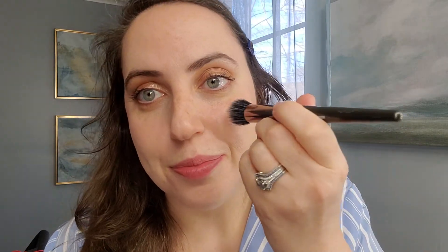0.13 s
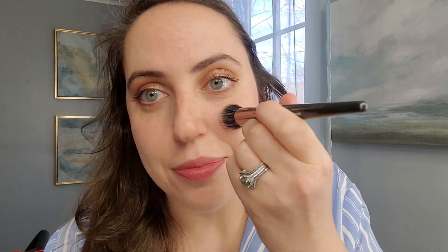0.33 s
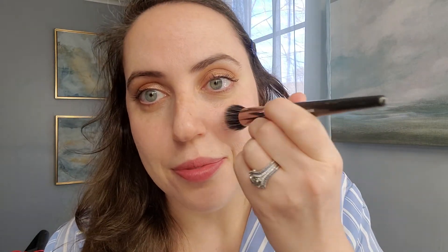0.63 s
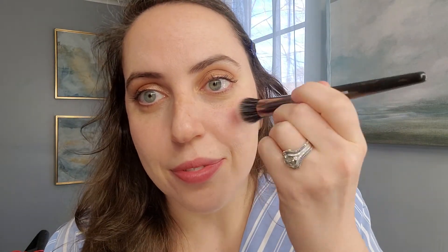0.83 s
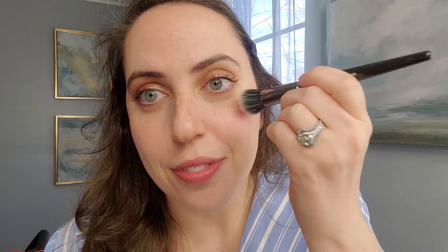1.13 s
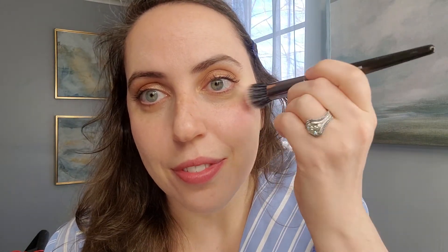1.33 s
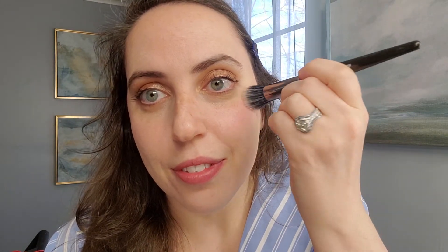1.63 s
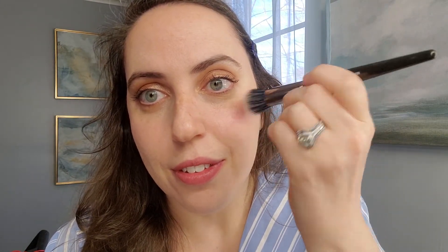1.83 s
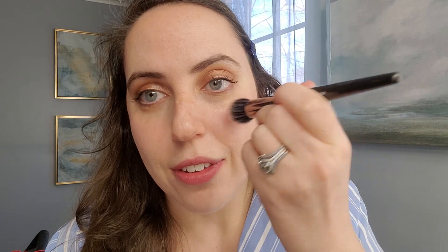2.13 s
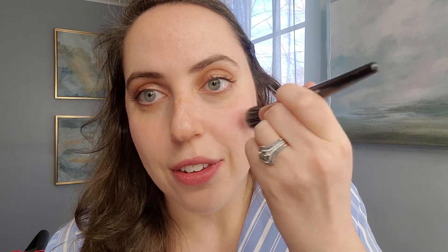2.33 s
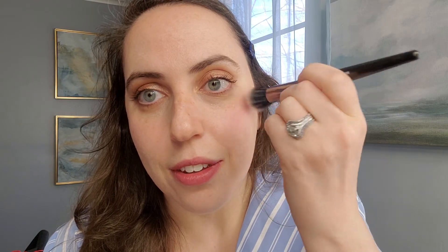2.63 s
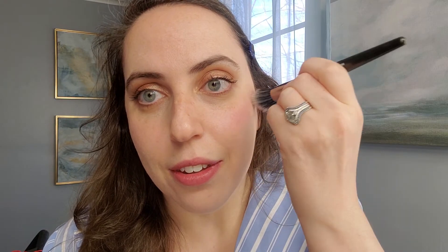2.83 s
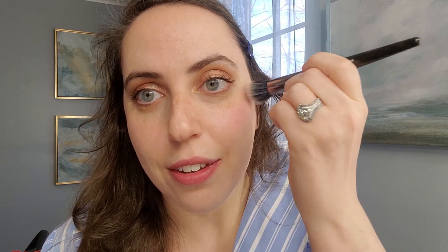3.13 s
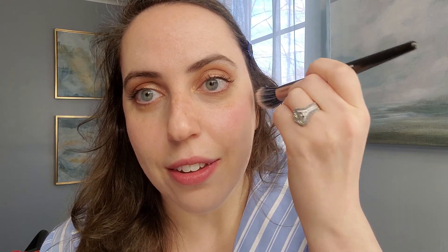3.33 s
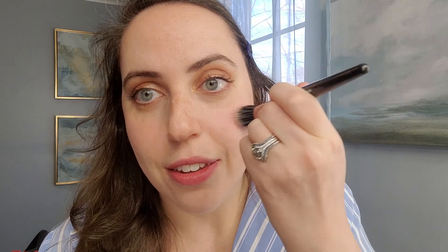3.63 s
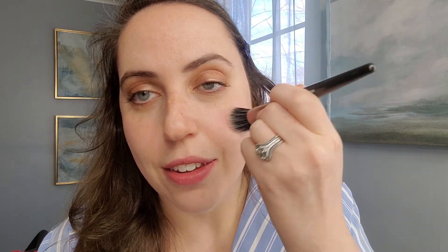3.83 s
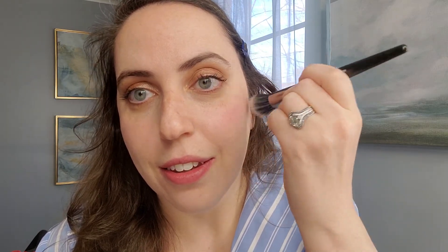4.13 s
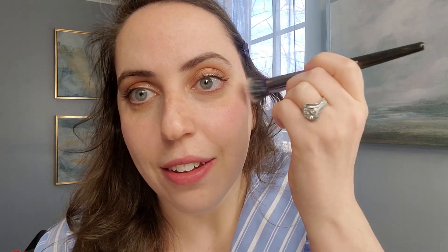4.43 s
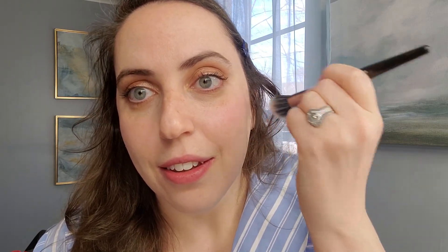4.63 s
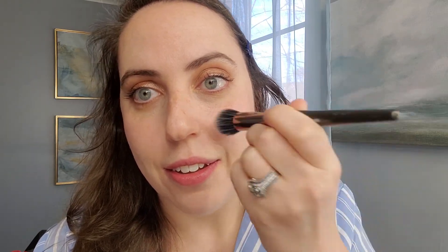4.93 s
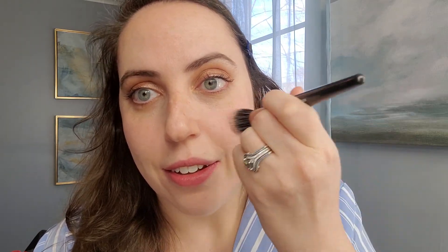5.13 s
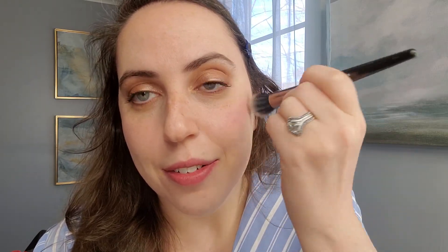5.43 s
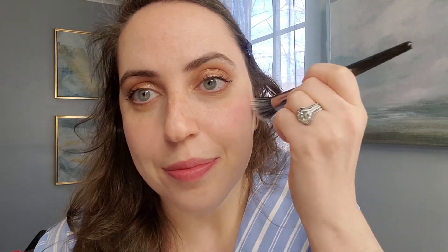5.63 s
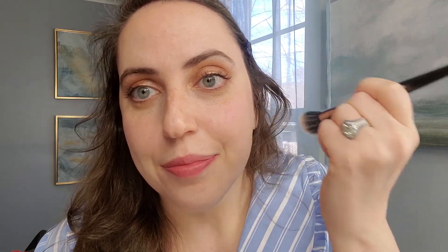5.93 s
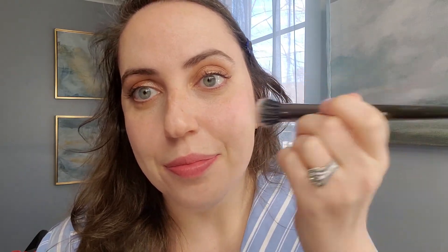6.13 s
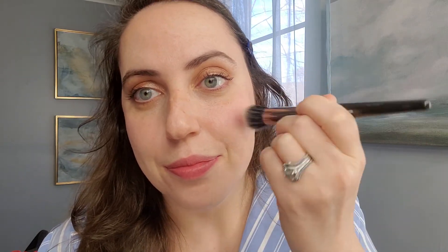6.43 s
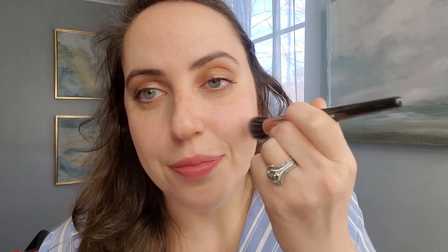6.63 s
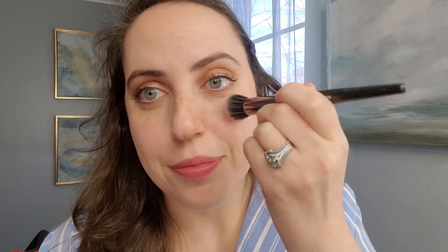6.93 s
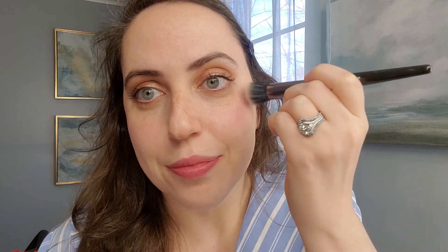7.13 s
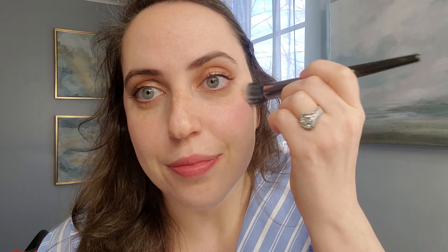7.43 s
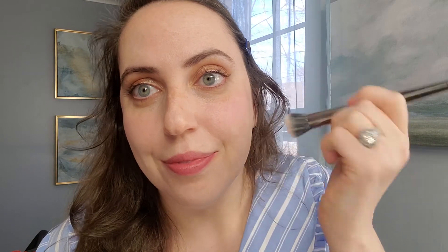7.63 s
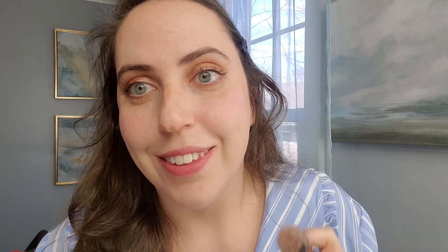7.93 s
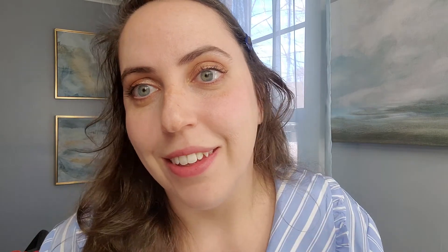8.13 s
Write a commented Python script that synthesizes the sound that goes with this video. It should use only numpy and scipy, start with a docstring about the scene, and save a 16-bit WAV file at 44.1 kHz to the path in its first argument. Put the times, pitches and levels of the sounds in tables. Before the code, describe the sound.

A dense makeup brush pats a cheek close to a phone in a small quiet room. Soft low thumps with hollow notes and bristly puffs come irregularly, two or three a second at most, brighter early and duller later. Low hum lies beneath, and a faint high sizzle throbs beside the left microphone. At the end a sleeve rustles as the arm drops, with a few small clicks.

```python
"""A dense makeup brush is patted on a cheek, close to a phone in a small quiet room.
Each pat is a soft low thump and a hollow note (slowly rising modes) with a puff of bristles (shaped noise).
Near the end the arm drops with a rustle of comb-filtered noise; small clicks of noise and decaying modes
are scattered through the scene, most of them late. The room hums with low noise and wavering sines.
A faint throbbing sizzle of dense random ticks sits right beside the left microphone."""
import sys
import numpy as np
from scipy import signal
from scipy.fft import rfft, irfft, next_fast_len
from scipy.io import wavfile
from scipy.ndimage import map_coordinates

SR = 44100
rng = np.random.default_rng(int(sys.argv[2]) if len(sys.argv) > 2 else 0)


def master_out(mix):
    """Clip the mix to full scale and print it as 16-bit PCM to the path in sys.argv[1]."""
    frames = np.transpose(np.atleast_2d(mix))
    ceiling = np.clip(frames, -1, 1)
    pcm = np.round(ceiling * 32767).astype(np.int16)
    wavfile.write(sys.argv[1], SR, pcm)


N = 365853


def amp(db):
    """Decibels to gain."""
    return 10 ** (np.asarray(db) / 20)


def unit(x):
    """Scale to rms 1."""
    return x / np.sqrt(np.mean(x ** 2) + 1e-20)


def along(points, hz):
    """Read (Hz, value) points on a log frequency axis."""
    f, v = np.transpose(points)
    return np.interp(np.log(hz + 1), np.log(f + 1), v)


def filtered(x, response):
    """Multiply the spectrum of x by a response of frequency, zero-padded."""
    n = x.shape[-1]
    m = next_fast_len(n + 8192)
    return irfft(rfft(x, m) * response(np.fft.rfftfreq(m, 1 / SR)), m)[..., :n]


def coloured(x, spectrum):
    """Shape x by (Hz, dB) points, then scale to rms 1."""
    return unit(filtered(x, lambda hz: amp(along(spectrum, hz))))


def wobble(knots_per_s):
    """A smooth random curve through normally distributed knots."""
    knots = rng.standard_normal(int(N * knots_per_s / SR) + 4)
    return map_coordinates(knots, [np.arange(N) * knots_per_s / SR])


def swell(t, rise_s, t60_s, hold_s=0):
    """A soft rise, a hold, then an exponential decay."""
    rise = np.sin(np.pi / 2 * np.clip(t / rise_s, 0, 1)) ** 2
    return rise * amp(-60 * np.maximum(t - rise_s - hold_s, 0) / t60_s)


def add(track, start_s, sound):
    """Mix a sound into a track at a start time."""
    i = max(round(start_s * SR), 0)
    track[..., i:i + sound.shape[-1]] += sound[..., :N - i]


def soft_ring(modes, t, detune, scatter_db):
    """Modes that build up under a soft contact, with random pitch and level offsets on each call."""
    chance = rng.standard_normal((len(modes), 2))
    ring = 0
    for (hz, db, delay_s, rise_s, t60_s), (level, pitch) in zip(modes, chance):
        since = t - delay_s
        tone = np.sin(2 * np.pi * hz * (1 + detune * pitch) * since)
        ring = ring + amp(db + scatter_db * level) * swell(since, rise_s, t60_s) * tone
    return ring


def reverb(x):
    """The walls' answer: noise decaying at its own rate per frequency, different at each microphone."""
    # Decay of the room. Each row: frequency in Hz, t60 in seconds.
    wall_decay = [(100, 0.29), (500, 0.6), (2000, 0.49), (10000, 0.067)]
    hz, t, z = signal.stft(rng.standard_normal((2, SR // 2)), SR, nperseg=256)
    decay = amp(-60 * t / along(wall_decay, hz)[:, None])
    tail = signal.istft(z * decay, SR, nperseg=256)[1]
    return signal.fftconvolve(x[None], tail / np.linalg.norm(tail[0]), axes=1)[:, :N]


def microphone_noise(level_db=-79):
    """A faint steady coloured hiss, unrelated between the two microphones."""
    # Spectrum of the microphones' own noise. Each row: frequency in Hz, relative density in dB per Hz.
    mic_colour = [(300, 5.5), (900, 11), (1400, 5), (3000, -0.5), (6000, -3.5), (8500, 1), (16000, 0.5)]
    return amp(level_db) * coloured(rng.standard_normal((2, N)), mic_colour)


def room_tone(rumble_db=-54.5, drift_db=2.0, waver_db=2):
    """Low rumble of the house, wavering lines of a distant motor, and a drone that holds, then dies away."""
    # Spectrum of the room air. Each row: frequency in Hz, relative density in dB per Hz.
    air_colour = [(15, -18), (28, -11), (46, -7), (70, -4), (88, -4.5), (125, -11.5), (165, -15.5),
                  (230, -15), (300, -23), (450, -32), (850, -42.5), (1300, -47), (3000, -58.5),
                  (16000, -95)]
    # Correlation of the air between microphones. Each row: frequency in Hz, left-right likeness (0 to 1).
    likeness = [(60, 0.92), (150, 0.88), (300, 0.58), (600, 0), (1500, 0.16)]
    # Motor lines. Each row: frequency in Hz, level in dB before waver and left-right balance.
    hum_lines = [(44, -58.5), (120, -62), (145, -68), (180, -68), (274, -77), (813, -89.5), (1044, -88.5)]
    drone_hz, drone_db, drone_hold_s, drone_t60_s = 69.5, -49.5, 0.34, 6
    t = np.arange(N) / SR

    def mid_side(hz):
        turn = np.arccos(np.clip(along(likeness, hz), -1, 1)) / 2
        return np.array([np.cos(turn), np.sin(turn)])

    mid, side = filtered(coloured(rng.standard_normal((2, N)), air_colour), mid_side)
    air = amp(rumble_db + drift_db * wobble(3.645)) * np.array([mid + side, mid - side])
    hum = np.zeros(N)
    for hz, db in hum_lines:
        level = amp(db + waver_db * wobble(5))
        hum += level * np.sin(2 * np.pi * hz * t + 0.5 * wobble(4.4))
    fade = amp(drone_db - 60 * np.maximum(t - drone_hold_s, 0) / drone_t60_s)
    drone = fade * np.sin(2 * np.pi * drone_hz * t + 0.66 * wobble(5.6))
    return (air + hum + drone) * amp([[1], [-1.2]])  # left, right


def sizzle(hiss_db=-66.0, fizz_db=-74, crackle_db=-63.0, spit_db=-74.0, whistle_db=-72,
           throb_hz=4.937, throb_offset_s=0.014, throb_lean_rad=0.2, throb_db=7, fizz_throb_db=1.0,
           ticks_per_s=900, spits_per_s=14, smooth=1.0, unrest_db=1, whistle_hz=5470):
    """Tiny dense ticks by the left microphone, likely the phone's lens drive, throbbing over a steadier hiss."""
    # Spectra of hiss, throbbing crackle and top fizz. Each row: frequency in Hz, relative density in dB per Hz.
    hiss_colour = [(400, -13.5), (1300, -11.5), (2300, -22), (3500, -5), (4200, -5.5), (4750, -1.5),
                   (5200, 0), (5480, 2.5), (5850, -8.5), (6400, -25.5), (7600, -37), (9000, -26.5)]
    crackle_colour = [(1500, -18), (2250, -12), (2550, -4), (3600, -1), (4150, -6.5), (4700, 3.5),
                      (5500, -3), (6000, -8.5), (6400, -20.5), (8000, -33), (11000, -28), (12200, -28.5),
                      (13700, -22), (16000, -27)]
    fizz_colour = [(7500, -56), (9200, -15), (10200, -7.5), (10900, 0.5), (11900, -6), (13000, -2.5),
                   (13700, 3), (14700, -1), (16000, -10.5)]
    phase = 2 * np.pi * throb_hz * (np.arange(N) / SR - throb_offset_s)
    throb = np.cos(phase - throb_lean_rad * np.cos(phase))  # builds slowly, drops faster
    gate = 1 - 2 * ((1 - throb) / 2) ** 1.54  # broad crests, short dips
    unrest = unrest_db * unit(wobble(16) + wobble(55))  # no two swells are alike

    ticks = unit((rng.random(N) < ticks_per_s / SR) * rng.standard_normal(N))
    crackle = coloured(ticks + smooth * rng.standard_normal(N), crackle_colour)
    crackle = crackle * amp(crackle_db + throb_db * (gate - 1.0) + unrest)
    # single ticks stand out, also between the swells
    spits = (rng.random(N) < spits_per_s / SR) * rng.uniform(0.53, 1, N)
    spits = coloured(spits, crackle_colour) * amp(spit_db)

    hiss = coloured(rng.standard_normal(N) + 0.47 * ticks, hiss_colour)
    hiss = hiss * amp(hiss_db + 1.35 * unrest)
    fizz = coloured(rng.standard_normal(N) + 0.5 * ticks, fizz_colour)
    fizz = fizz * amp(fizz_db + fizz_throb_db * throb + 0.58 * unrest + wobble(200))
    # a narrow resonance sings faintly at the top of the hiss
    pitch_hz = whistle_hz + 45 * wobble(8) + 25 * wobble(400)
    whistle = amp(whistle_db + 2.7 * wobble(60)) * np.sin(2 * np.pi * np.cumsum(pitch_hz) / SR)
    return (crackle + spits + hiss + fizz + whistle) * amp([[0], [-36]])  # left, right


def sleeve(level_db=-54, grain_db=1.0, gap_s=0.00158, opening_s_per_s=0.00407, bounce=0.45):
    """Cloth and hair rub as the arm comes down in one sweep: grainy noise with a moving comb."""
    # Spectrum of the rub. Each row: frequency in Hz, relative density in dB per Hz.
    rub_colour = [(200, -5.5), (600, -11), (1000, -5.5), (1400, -2), (2000, -10), (2800, -13.5),
                  (4000, -7.5), (6000, -25), (8300, -37.5), (13000, -28.5), (16000, -26)]
    start_s, rise_s, hold_s, t60_s = 7.745, 0.17, 0.091, 0.82
    right_tilt = [(700, -3.5), (1000, -1.5), (1500, -14), (4000, -16), (8500, 11.5), (14000, -5)]  # Hz, dB
    t = np.arange(N) / SR
    sweep = swell(t - start_s, rise_s, t60_s, hold_s)
    rub = coloured(rng.standard_normal((2, N)) * amp(grain_db * wobble(330)), rub_colour)
    # a bounce off the body comes later as the arm moves away, sweeping a comb through the rub
    delay_s = gap_s + opening_s_per_s * np.maximum(t - start_s, 0)
    bounced = np.array([np.interp(t - delay_s, t, side) for side in rub])
    rub = unit(rub + bounce * bounced)
    rub[1] = filtered(rub[1], lambda hz: amp(along(right_tilt, hz)))
    return amp(level_db) * sweep * rub


def clicks(snap_t60_s=0.035, wet_db=-7):
    """Small clicks of the brush handle ticking against the fingers: a noise snap and briefly ringing modes."""
    # Clicks. Each row: start in seconds, ring level in dB before left-right balance, snap level in dB.
    click_rows = [(1.943, -88, -70), (4.342, -59.5, -78), (4.388, -65, -82), (5.111, -57.5, -88),
                  (7.689, -82, -72), (8.169, -45.5, -64), (8.186, -55, -77), (8.26, -58, -85),
                  (8.283, -57, -85)]
    # Click modes. Each row: frequency in Hz, relative level in dB, t60 in seconds.
    click_modes = [(1360, -6.5, 0.036), (1437, -5, 0.036), (3520, -7, 0.017)]
    snap_colour = [(2000, -5), (7500, 8), (11000, -2), (16000, -13)]  # Hz, dB
    ring, snap = np.zeros(N), np.zeros(N)
    t = np.arange(SR // 4) / SR
    modes = sum(amp(db - 60 * t / t60_s) * np.sin(2 * np.pi * hz * t) for hz, db, t60_s in click_modes)
    for start_s, ring_db, snap_db in click_rows:
        add(ring, start_s, amp(ring_db) * modes)
        crack = coloured(rng.standard_normal(len(t)), snap_colour)
        add(snap, start_s, amp(snap_db - 60 * t / snap_t60_s) * crack)
    ring_heard = (ring + amp(wet_db) * reverb(ring)) * amp([[4], [-12]])  # left, right
    return ring_heard + snap + amp(wet_db) * reverb(snap)


def pats(puff_db=1, wet_db=-11, side_db=-4, grain_db=0.83):
    """Bristles splay, flesh swings and the cheek sounds hollow; brisk pats are brighter and more sudden."""
    # Pats. Each row: landing time in seconds, strength in dB, briskness (treble lift of the puff) in dB.
    pat_rows = [(0.084, -58, 2), (0.442, -54.5, 5), (0.901, -60.5, -2), (1.106, -59.5, 3.5),
                (1.481, -55, 6), (2.074, -57, -2.5), (2.281, -56, 2), (2.69, -55.5, 0.5),
                (3.384, -53.5, -1), (3.897, -55.5, -5), (4.09, -60.5, -6.5), (4.484, -55.5, -12),
                (5.083, -60.5, -12.5), (5.283, -58, -7), (5.676, -55, -5), (6.465, -56, -6.5),
                (7.308, -58, -6), (7.702, -59.5, -9)]
    # Low swing of the flesh and the room's late boom, then the hollow of the cheek.
    # Each row: frequency in Hz, relative level in dB, delay in seconds, rise in seconds, t60 in seconds.
    thump_modes = [(47.2, 6.5, 0.0023, 0.028, 0.28), (53.8, -1, 0.0755, 0.053, 0.48),
                   (84.3, -7, .01, 0.034, 0.71)]
    hollow_modes = [(250.5, 1, .034, 0.02, 0.12), (224.4, -6, 0.01788, 0.012, 0.34),
                    (284.2, -16, .02, 0.046, 0.33), (509, -17.5, .03, 0.02, 0.2)]
    # Bristles on skin. Each row: frequency in Hz, relative density in dB per Hz.
    puff_colour = [(60, -0.5), (150, -3.5), (280, 3), (380, -2), (620, -1.5), (720, -8), (1080, -5.5),
                   (1220, -6.5), (1650, -14.5), (2200, -30), (4000, -59), (9000, -44)]
    # A nearby surface colours the way to each microphone. Each row: frequency in Hz, gain in dB.
    left_path = [(330, 4), (390, 5), (440, 1.5), (505, 9), (560, -9.5), (640, 3.5), (800, -5.5),
                 (1040, 1.5), (1150, -7.5), (1550, -5.5), (2000, -1)]
    right_path = [(280, 5.5), (345, -2.5), (470, 1), (650, -1.5), (790, 4.5), (1000, -7), (1150, -10),
                  (1500, -33), (2000, -6)]
    thump_db, thump_ease_db_per_s = 16.5, 0.7  # the hand presses a little less as it goes on
    hollow_db, hollow_loss = 9.7, 0.41  # dB lost per dB of briskness
    lead_s = 0.02  # the tips touch this long before the pat lands
    puff_rise_s, puff_hold_s, puff_t60_s = 0.02, 0.033, 0.37
    rise_halves_db = 19.5  # this much more briskness halves the puff's rise
    low, note, puff = np.zeros(N), np.zeros(N), np.zeros((2, N))
    t = np.arange(SR // 2) / SR
    for land_s, strength_db, brisk_db in pat_rows:
        touch_s = land_s - lead_s
        thump_gain = amp(strength_db + thump_db - thump_ease_db_per_s * land_s)
        add(low, touch_s, thump_gain * soft_ring(thump_modes, t, detune=0.015, scatter_db=0))
        hollow_gain = amp(strength_db + hollow_db - hollow_loss * brisk_db)
        add(note, touch_s, hollow_gain * soft_ring(hollow_modes, t, detune=0.014, scatter_db=-0.5))

        rise_s = puff_rise_s * 2 ** (-brisk_db / rise_halves_db)
        contact = swell(t, rise_s, puff_t60_s, puff_hold_s)
        tilt = [(500, 0), (1400, brisk_db), (2200, brisk_db - 2)]
        bristles = coloured(rng.standard_normal((2, len(t))), puff_colour)
        bristles = filtered(bristles, lambda hz: amp(along(tilt, hz)))
        add(puff, touch_s, amp(strength_db + puff_db) * contact * bristles)
    puff = puff * amp(grain_db * wobble(250))  # tufts give way one after another
    # the shorter waves reach the two microphones differently
    side = amp(side_db) * filtered(puff[1], lambda hz: amp(along([(250, -8), (450, 3.5)], hz)))
    heard = puff[0] + np.array([side, -side]) + amp(wet_db) * reverb(puff[0])
    heard = filtered(heard, lambda hz: amp([along(left_path, hz), along(right_path, hz)]))
    return heard + (low + note) * amp([[1], [-1.3]])  # left, right


def scene():
    """All sources at the two microphones."""
    return microphone_noise() + room_tone() + sizzle() + sleeve() + clicks() + pats()


def record(dry, top_hz=15780):
    """The phone keeps nothing above its band limit."""
    return filtered(dry, lambda hz: hz < top_hz)


dry = scene()
out = record(dry)
master_out(out)
```